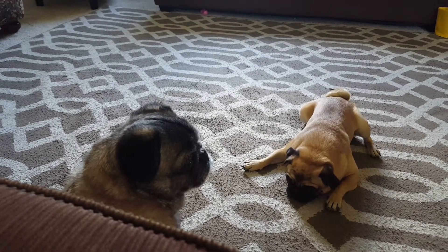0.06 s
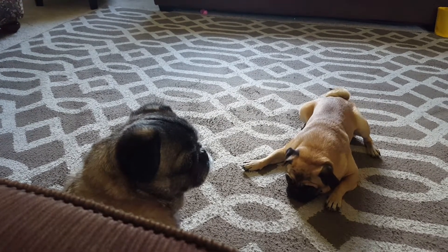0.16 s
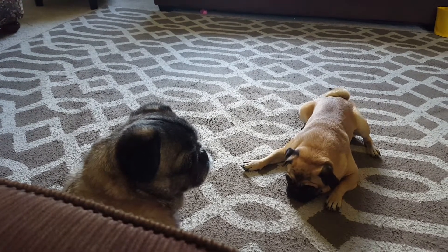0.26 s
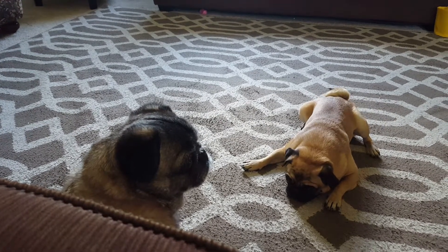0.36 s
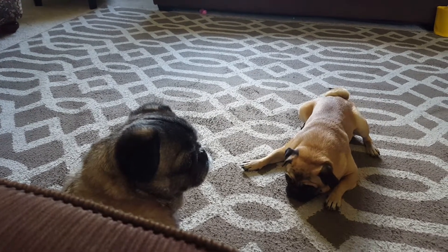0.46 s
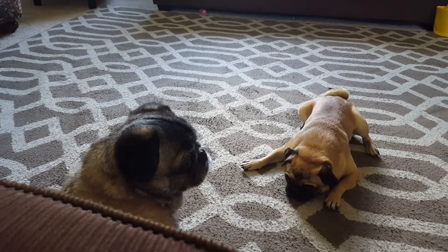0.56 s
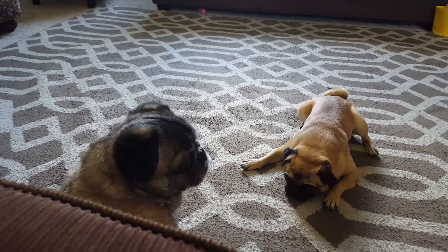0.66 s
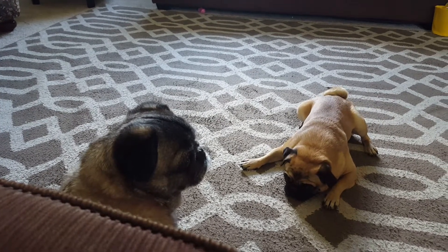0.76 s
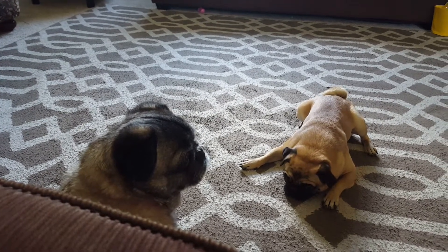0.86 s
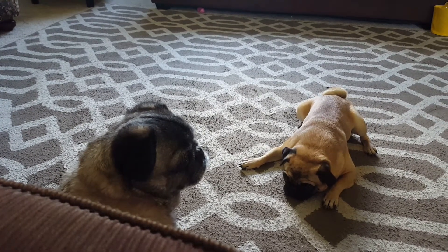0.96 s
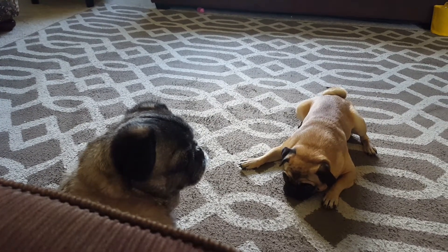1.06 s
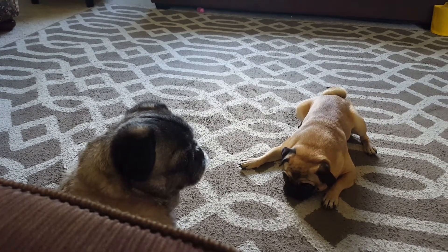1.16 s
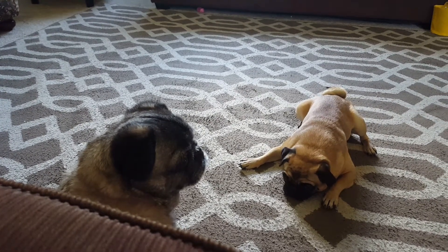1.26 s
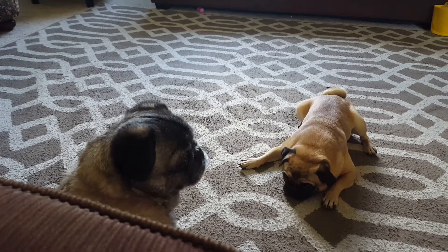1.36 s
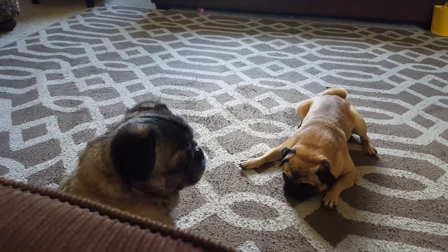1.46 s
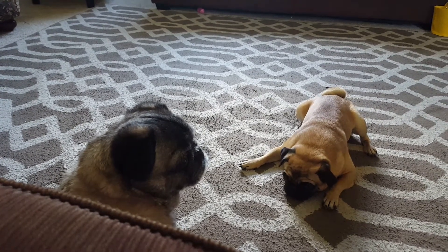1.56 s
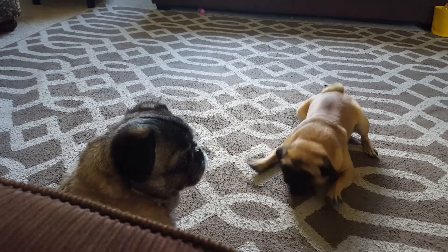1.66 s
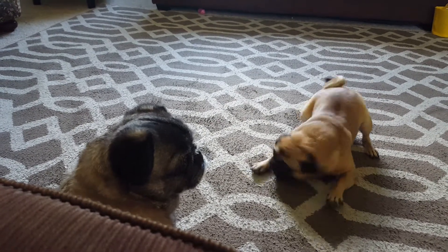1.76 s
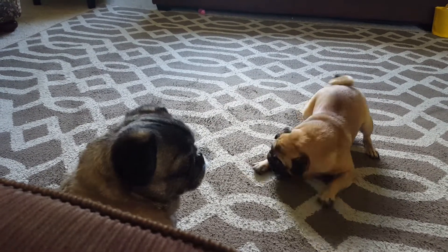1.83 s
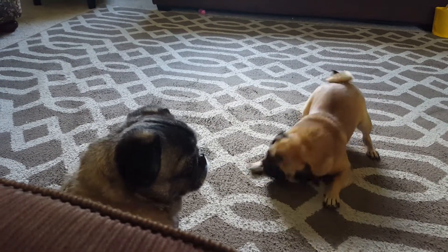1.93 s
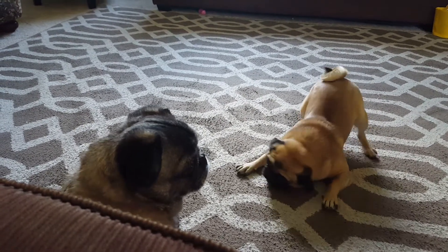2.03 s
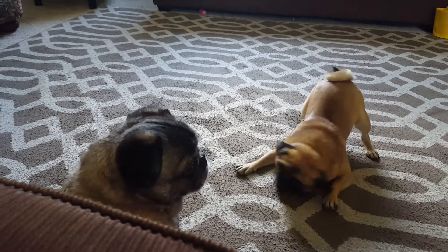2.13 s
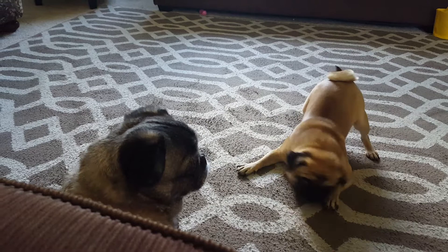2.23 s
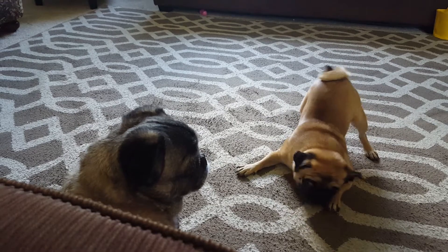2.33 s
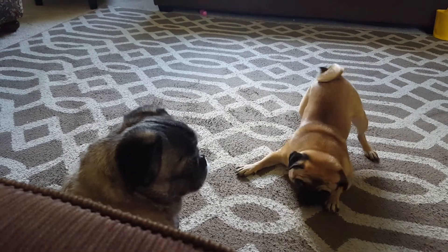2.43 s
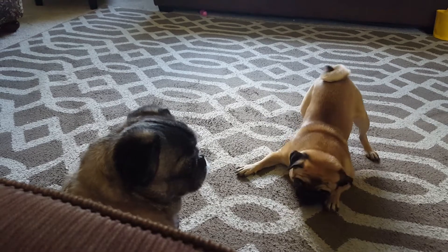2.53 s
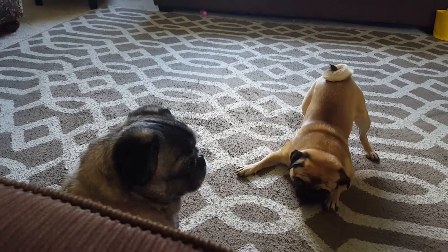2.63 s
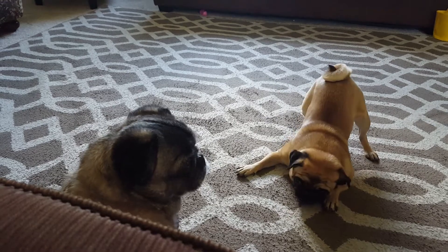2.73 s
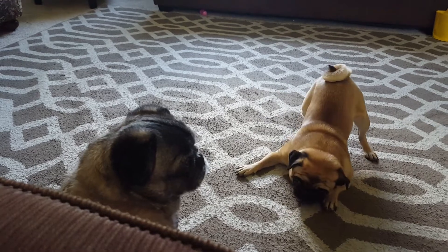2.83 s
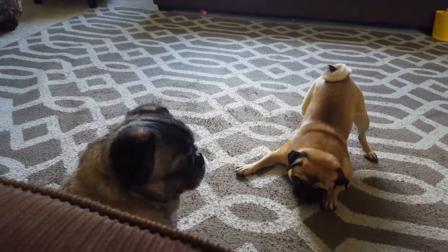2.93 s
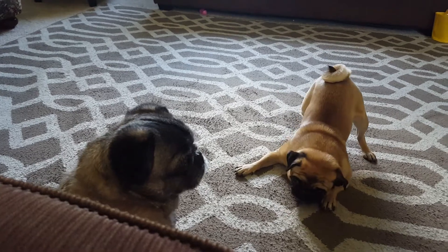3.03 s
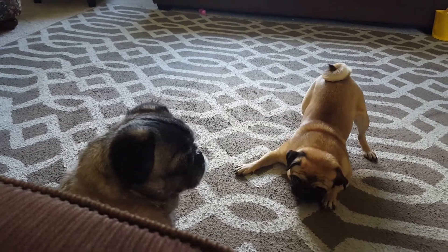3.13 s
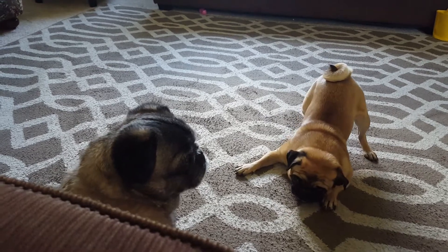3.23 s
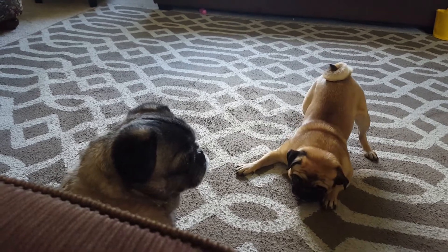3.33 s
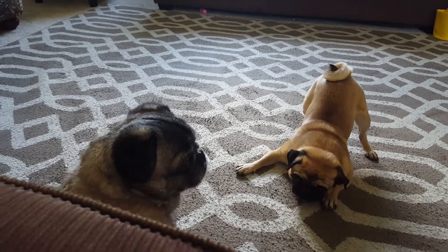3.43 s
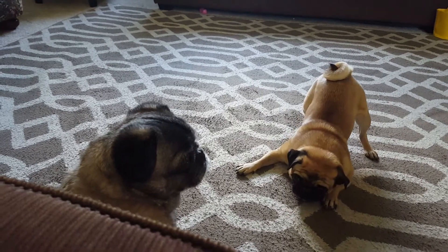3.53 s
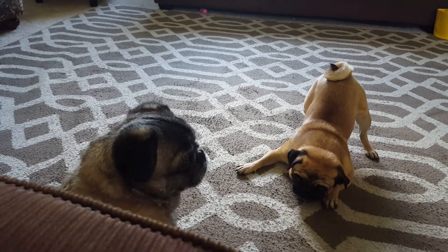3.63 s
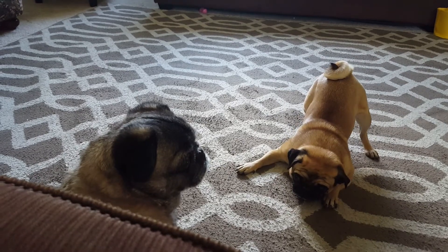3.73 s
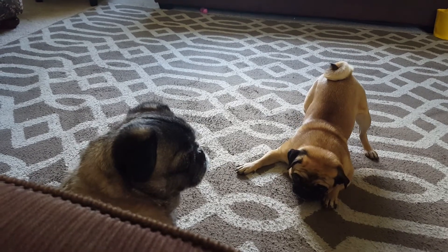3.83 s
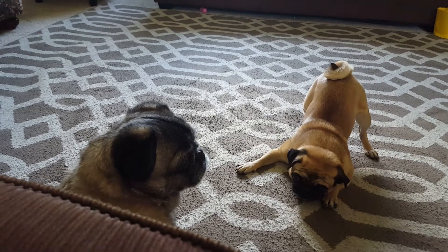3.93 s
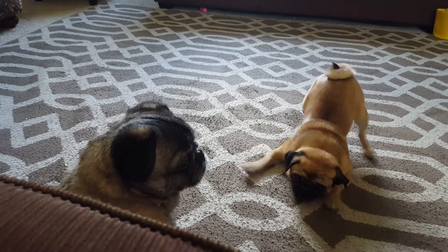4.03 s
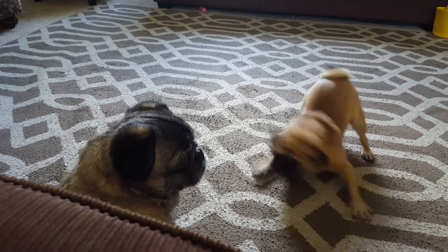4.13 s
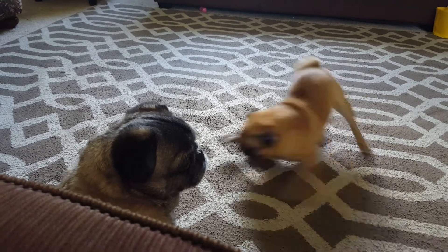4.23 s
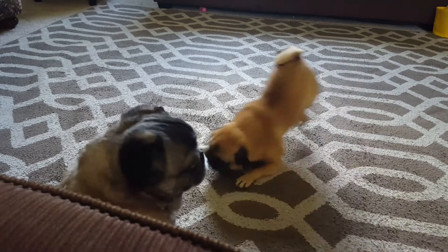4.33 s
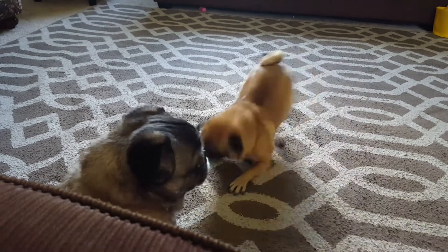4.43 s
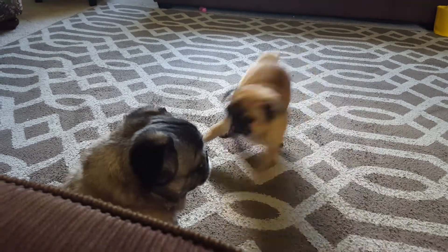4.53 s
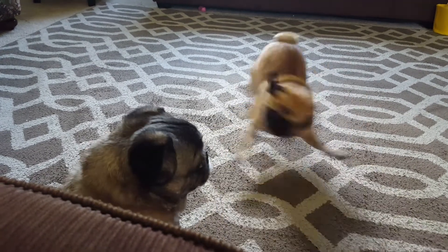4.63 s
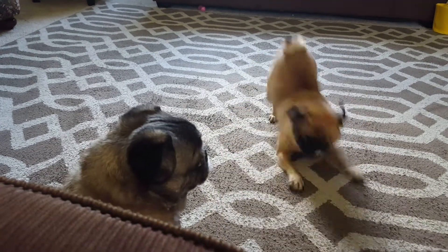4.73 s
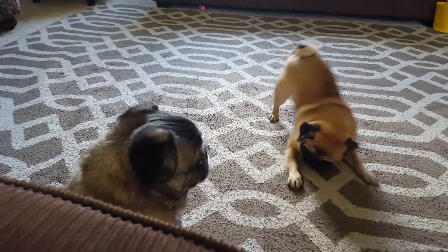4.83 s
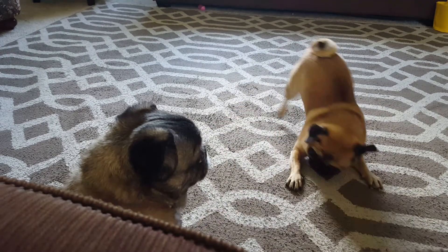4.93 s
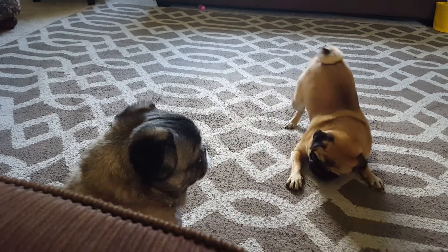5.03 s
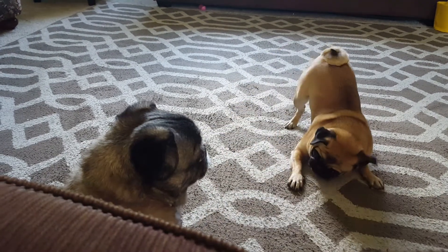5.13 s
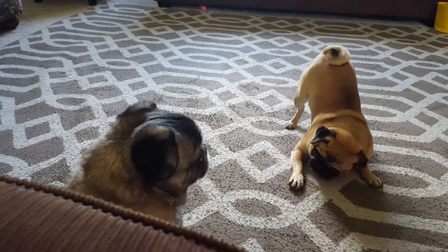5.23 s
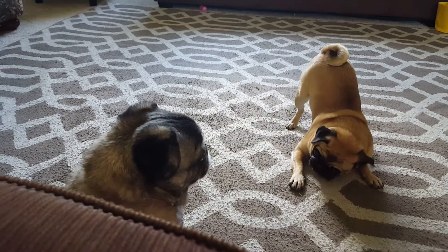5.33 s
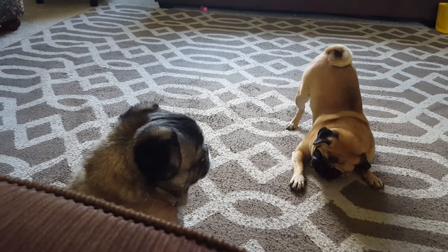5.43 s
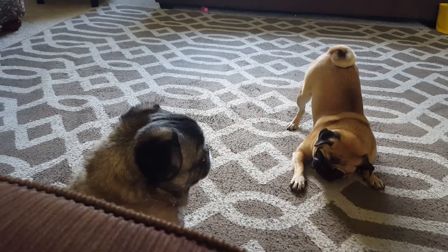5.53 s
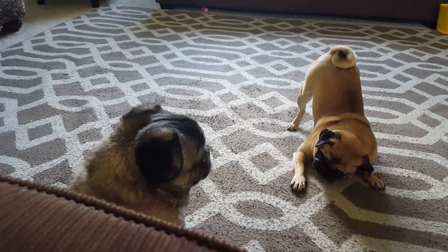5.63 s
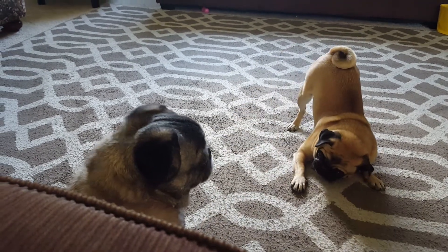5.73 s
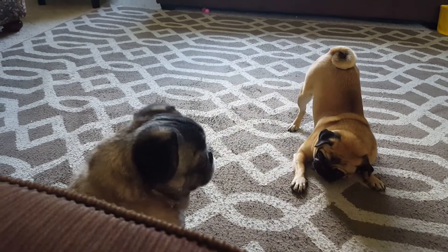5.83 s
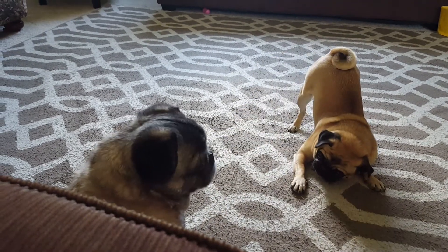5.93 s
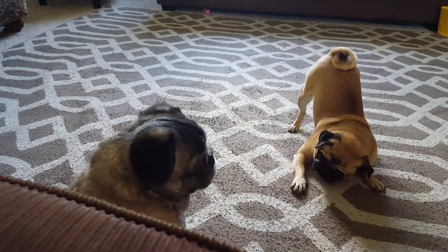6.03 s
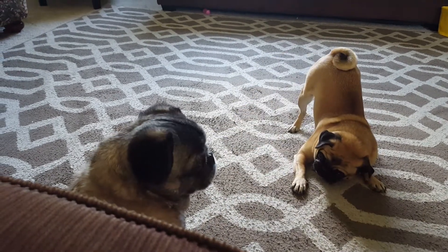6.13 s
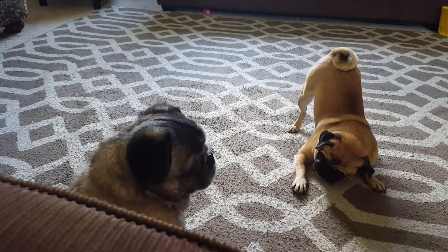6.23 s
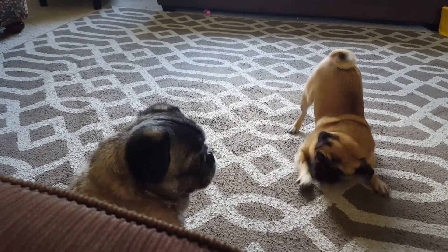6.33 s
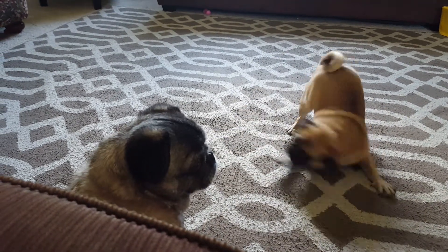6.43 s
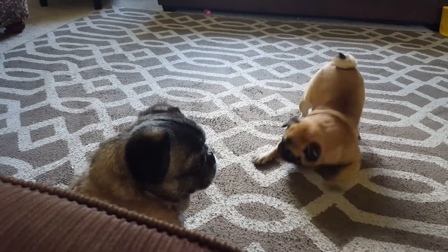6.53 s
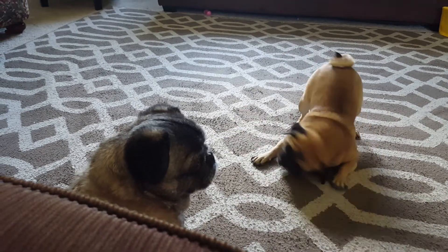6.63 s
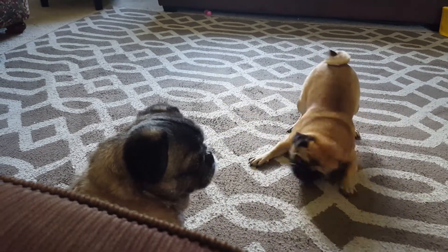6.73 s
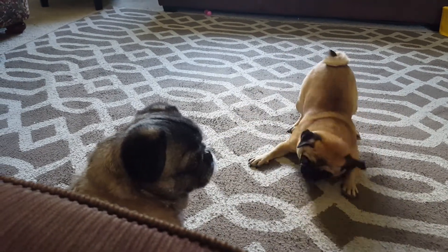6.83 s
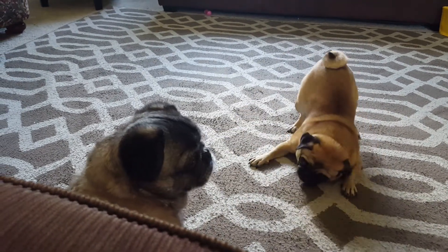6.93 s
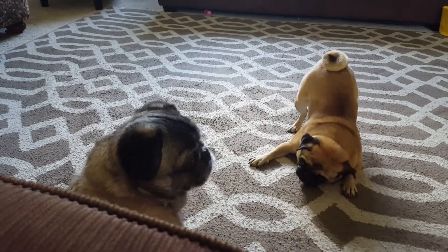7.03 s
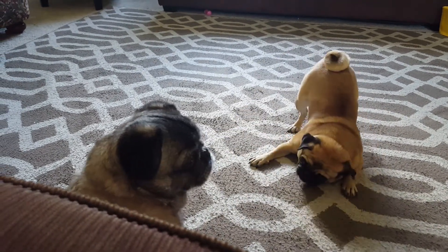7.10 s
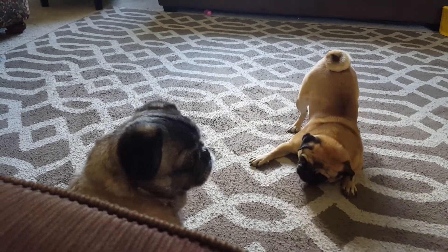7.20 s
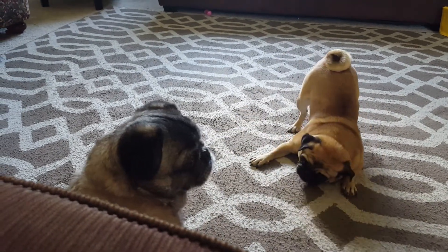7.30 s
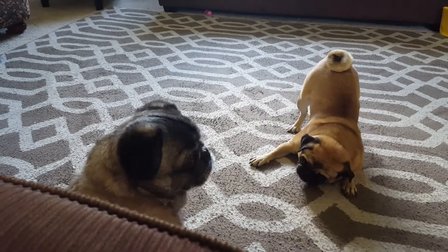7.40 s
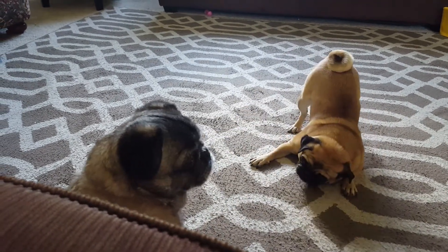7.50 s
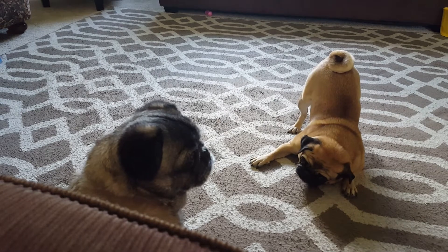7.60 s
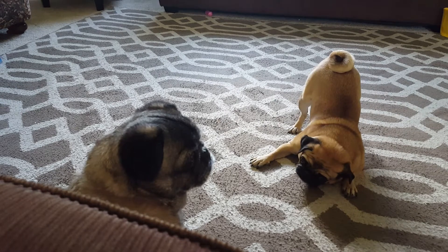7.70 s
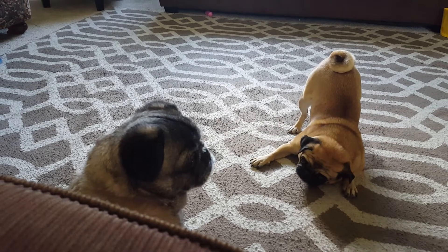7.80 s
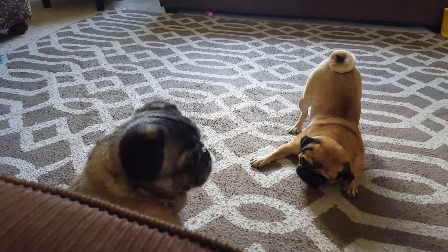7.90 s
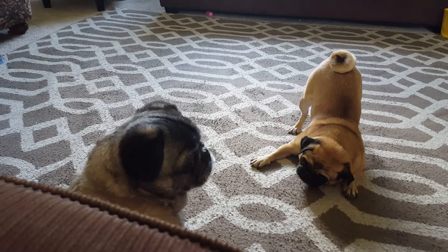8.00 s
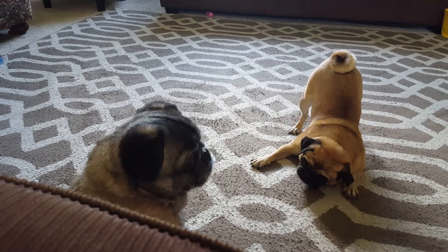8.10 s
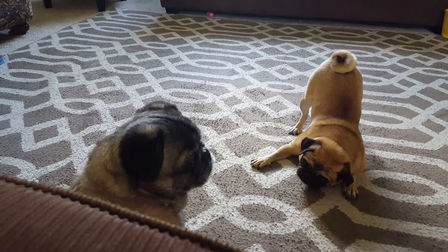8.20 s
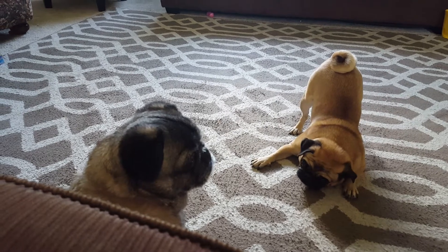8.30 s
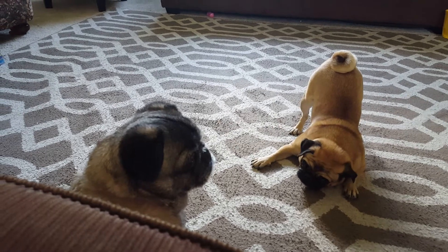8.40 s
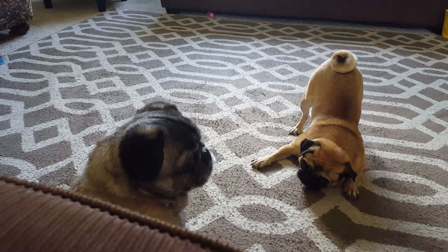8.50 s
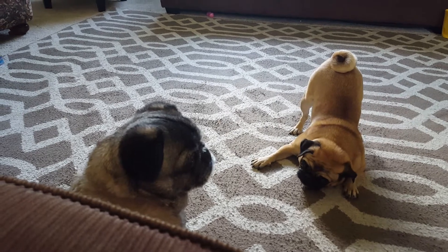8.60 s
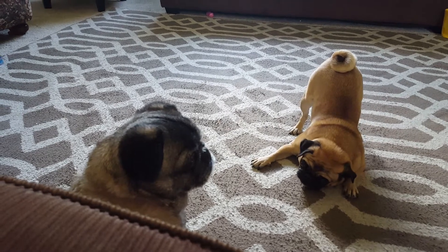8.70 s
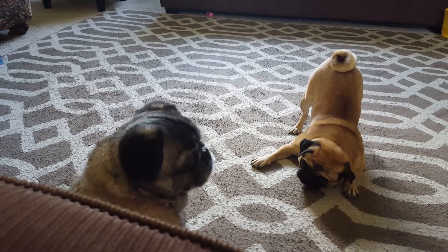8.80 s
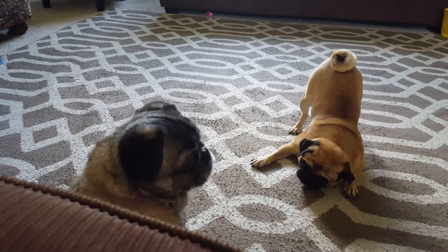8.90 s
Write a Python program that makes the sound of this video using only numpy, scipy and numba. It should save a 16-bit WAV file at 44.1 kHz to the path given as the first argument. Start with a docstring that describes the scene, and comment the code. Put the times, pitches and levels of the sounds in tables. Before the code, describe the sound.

A small dog moans softly, lets out three bursts of hoarse barks with snorts between, then growls low in a living room.

```python
"""A small furnished living room, a pug close to the microphone.
Soft nasal moans wind up to three bursts of hoarse barks, each followed by snorts; a low rattling
growl ends it. The voice is vocal-fold pulses and breath noise through throat resonances, which
the jaw sweeps in the barks. Snorts are air through palate and nostrils. Lips smack, the room rings
briefly. Behind: soft low bumps against the microphone, mostly left, one paw thud and room tone."""
import sys
import numpy as np
from scipy import signal
from scipy.fft import rfft, irfft
from scipy.io import wavfile
from scipy.ndimage import uniform_filter1d
from numba import njit

SR = 44100
rng = np.random.default_rng(int(sys.argv[2]) if len(sys.argv) > 2 else 0)


def dump_mix(stems):
    """Bounce the given channels to the path in sys.argv[1] as a 16-bit WAV at rate SR."""
    frames = np.atleast_2d(stems).T  # one column per channel
    limited = np.clip(frames, -1, 1)  # hard clip at full scale
    pcm = np.round(limited * 32767).astype(np.int16)
    wavfile.write(sys.argv[1], SR, pcm)


N = 395136
TIME_S = np.arange(N) / SR
FREQS_HZ = np.maximum(np.arange(N // 2 + 1) * SR / N, 1)

# Barks. Each row: start, length and attack in seconds, level and sag in dB, release in dB/s,
# widest jaw as a share of the length, pitch shut and wide in Hz, hoarseness 0-1, formant 1 shut and
# wide in Hz, vowel length in seconds, formant 2 top in Hz and trim in dB, formant 3 start and end
# in Hz and trim in dB.
BARKS = [(1.652, 0.12, 0.022, -10, 10.5, 110, .5, 200.8, 295, .33, 890, 1260, .14, 3000, -1.5, 3700, 5110, -1.5),
         (1.805, .175, 0.11, -14, 3.5, 452, .75, 297.2, 404, 0.49, 686, 1340, 0.19, 3150, -4, 3260, 4966, -5.5),
         (2.050, 0.19, 0.14, -16, 1.5, 333, .65, 335.3, 603, 0.56, 810, 1254, .23, 2786, -5, 5800, 4830, -6.5),
         (4.055, .130, 0.029, -9.5, 8.5, 459, .4, 214.1, 355.1, 0.47, 950, 1107, .145, 2860, -7, 6370, 4110, -3),
         (4.272, 0.088, 0.044, -12.5, 2, 225, .42, 386.3, 486.2, .46, 783, 1450, 0.077, 2700, -11, 2900, 4390, -3),
         (4.573, .074, 0.031, -12.5, 3.5, 602.5, .45, 119.8, 150, .42, 1516, 1570, .085, 2715, -5.5, 2620, 3746, -5),
         (6.359, .120, 0.029, -10.5, 7, 274, .27, 189.5, 390, .55, 938, 1159, 0.097, 2814, -4.5, 5760, 3725, -1.5),
         (6.594, 0.14, 0.022, -16.5, 0, 394, .3, 279.2, 323.2, 0.8, 953, 1342, 0.13, 2870, -8, 5080, 4560, -1.5)]
# The "wow" vowel of every bark. Each row: share of the vowel length, formant 1 width factor,
# formant 2 as a share of its top, swell of formants 2 and 3 in dB.
BARK_VOWEL = [(0, .9, 0.58, -15, -23), (.17, 1.2, .63, -4.5, -20.5), (.37, 1.2, 0.84, -0.5, -18.5),
              (.66, 1.1, 0.98, -4, -3.5), (.88, .65, .97, -6, 0), (1.15, 0.4, .93, -2, -5.5)]
# Bark spectra: chest boom, high spray, feed to formant 3. Each row: frequency in Hz, gain in dB.
CHEST_SPECTRUM = [(90, -16), (170, -3), (400, 4.5), (700, 2), (1200, -24), (3000, -34.5)]
SPRAY_SPECTRUM = [(2500, -14), (6000, 7), (8000, 2.5), (10500, -12), (13000, -4), (16000, -15.5)]
RASP_SPECTRUM = [(2000, -10.5), (3300, 5), (5200, -1.5), (6600, -5), (8000, -8)]
# Closed-mouth moans. Each row: start, length and time to top pitch in seconds, low, top and last
# pitch in Hz, level and sag in dB.
MOANS = [(0.574, 1.03, .77, 151.7, 204.4, 170.8, -45, 6), (3.442, 0.62, .59, 139, 189.6, 190.1, -47.5, 1),
         (7.039, .8, .45, 163.3, 180.2, 187.7, -53, -4)]
# Nose and throat, mouth shut. Each row: frequency in Hz, gain in dB.
MOAN_SPECTRUM = [(100, -6.5), (150, 16.5), (200, -2), (350, -4), (540, 5), (750, -10.5), (1100, -19),
                 (1750, -18), (2600, -23), (3600, -48), (4700, -20.5), (5800, -48.5), (7500, -48),
                 (12000, -58.5)]
# Growls, one curve each. Each row: time in seconds, pulse rate in Hz, roughness 0-1, level in dB,
# snarl resonance in Hz, wheeze in dB relative to the throat.
GROWLS = [
    [(1.3, 91, .15, -52, 1610, -25), (1.65, 91, .15, -47, 1600, -22)],
    [(7.66, 96, .15, -54, 1544, -27.5), (7.82, 99, 0.3, -51, 1539, -29), (7.9, 94, .3, -53, 1551, -27.5)],
    [(8.09, 88, 0, -46, 1600, -30.5), (8.15, 92, .25, -40, 1560, -27.5), (8.18, 135, .5, -40, 1510, -24),
     (8.33, 108, .2, -45, 1760, -19.5), (8.41, 118, .6, -46.5, 1630, -23),
     (8.53, 86, .05, -43.5, 1500, -29.5), (8.72, 86, 0.11, -40.5, 1430, -35.5),
     (8.89, 58, 0, -45, 1600, -31.5), (8.96, 72, 0.1, -40.5, 1650, -31)],
]
# Growling throat and nasal wheeze. Each row: frequency in Hz, gain in dB.
GROWL_SPECTRUM = [(70, -14.5), (120, 4), (260, 4), (370, 0.5), (560, 4), (850, -7), (1080, -6.5),
                  (1350, -23.5), (2500, -44)]
WHEEZE_SPECTRUM = [(3500, -4), (5000, 2.5), (6200, -19.5), (8000, -5.5), (10000, -22), (12000, -0.5),
                   (16000, -15.5)]
# Snorts. Each row: start, length and attack in seconds, level and sag in dB, nostril hiss in dB
# relative to the throat.
SNORTS = [(2.40, 0.1, 0.053, -38.5, 9, -26), (3.122, 0.34, .008, -55.5, 15, -5.5),
          (4.82, 0.28, 0.039, -45, 19, -10.5), (6.915, 0.096, .04, -47, 6.5, -23.5)]
# Voiced grunts in the snorts. Each row: start, length and attack in seconds, first pitch in Hz,
# fall in octaves/s, level and sag in dB.
GRUNTS = [(2.41, .13, 0.034, 278, 3.6, -39.5, 22), (3.135, .11, .01, 215, 8.7, -51.5, -1),
          (6.925, 0.077, 0.053, 233.5, 2.9, -48.5, 8)]
# Snorting throat, nostrils and grunting throat. Each row: frequency in Hz, gain in dB.
SNORT_SPECTRUM = [(150, -11), (400, -8), (800, -3), (1100, -5), (1550, 1), (1850, -2), (2400, -20),
                  (5000, -38)]
NOSTRIL_SPECTRUM = [(2500, -16), (4800, -4), (5700, -6), (7300, 1), (9200, -2), (10500, -15), (13500, -11),
                    (16000, -20)]
GRUNT_SPECTRUM = [(70, -26), (140, 11.5), (270, 13.0), (480, -33.0), (2000, -28.0)]
# Lip smacks and throat clicks. Each row: time in seconds, strike level in dB.
SMACKS = [(2.52, -18), (2.56, -30.5), (2.672, -39), (2.875, -49.5), (4.89, -22), (4.958, -25.5),
          (4.991, -33.5)]
# Microphone bumps and one paw thud. Each row: time in seconds, relative strike level in dB,
# left over right in dB.
BUMPS = [(0.108, -35.5, 16), (0.158, -34.5, 26), (0.226, -31.5, 18), (0.263, -28.5, 15), (3.3, -43, 30),
         (3.912, -30, 22), (4.78, -32.5, 1), (5.215, -42, 25), (5.245, -29, 26.5), (7.97, -46, 23)]
# Modes of the mouth and of the bumps. Each row: frequency in Hz, gain in dB, T60 in seconds.
MOUTH_MODES = [(720, -7, 0.011), (1355, -6.5, 0.011), (1500, -19.5, 0.012), (4670, -13, 0.0029)]
BUMP_MODES = [(83.5, -1, 0.18), (126, 0.5, 0.077), (183, 9, 0.015)]
# Microphone port imbalance. Each row: frequency in Hz, left over right in dB.
PORT_BALANCE = [(1400, 0.64), (2400, 2), (4400, -8), (8000, 10), (12000, -1.5)]
# Microphone port phase. Each row: frequency in Hz, lead of the left in radians.
PORT_PHASE = [(500, -.1), (1300, -.38), (4000, -0.65), (9000, -1.1)]
# Room decay. Each row: frequency in Hz, T60 in seconds.
ROOM_T60 = [(150, 0.85), (1000, .38), (4500, 0.41), (14000, 0.081)]
# Diffuse field. Each row: frequency in Hz, left-right coherence 0-1.
COHERENCE = [(50, 0.31), (200, .92), (700, 0.92), (2000, 0.13), (6000, 0.033)]
# Room tone. Each row: frequency in Hz, gain in dB.
ROOM_TONE_SPECTRUM = [(15, -34), (25, -8.5), (76, -8), (130, -4.5), (175, -8.5), (223, -4), (335, -5),
                      (545, -19.5), (591, -19.5), (1520, -29), (16000, -52.5)]


def barks():
    """The jaw sweeps pitch and formant 1; hoarseness swells mid-bark and widens that formant."""
    (age_s, length_s, attack_s, level_db, sag_db, release_db_per_s, widest, shut_hz, wide_hz, hoarse,
     f1_shut_hz, f1_wide_hz, vowel_s, f2_top_hz, f2_db, f3_start_hz, f3_end_hz, f3_db) = events(BARKS)
    shut_s = length_s + .03
    jaw = arch(age_s, widest * length_s, shut_s)
    strain = arch(age_s, .62 * length_s, shut_s)
    # Breath runs out: pitch drops, voice breaks up.
    spent_s = np.clip(age_s - length_s, 0, .15)
    fall_oct_per_s, breakup_per_s = 3.5, 2.5
    pitch_hz = (shut_hz + (wide_hz - shut_hz) * jaw ** 1.3) * 2 ** (-fall_oct_per_s * spent_s)
    rough = np.clip(hoarse * (.45 + .55 * strain) + breakup_per_s * spent_s, 0, 1)
    damping, f2_share, f2_swell_db, f3_swell_db = curves(BARK_VOWEL, age_s / vowel_s)
    f1_hz = f1_shut_hz + (f1_wide_hz - f1_shut_hz) * jaw ** .8
    f3_hz = f3_start_hz + (f3_end_hz - f3_start_hz) * np.clip(age_s / length_s, 0, 1)
    treble_db = f3_db + f3_swell_db
    source = vocal_folds(pitch_hz, rough, jitter=.14, shimmer_db=6.5, air=1.25)
    breathy = source + 1.6 * rng.standard_normal(N)   # air past teeth and tongue
    first = formant(source, f1_hz, width_hz=damping * (230 + 950 * rough))
    second = from_db(f2_db + f2_swell_db) * formant(source, f2_top_hz * f2_share, width_hz=680)
    third = from_db(treble_db) * formant(shaped(breathy, RASP_SPECTRUM), f3_hz, width_hz=1600)
    boom = shaped(source + .33 * rng.standard_normal(N), CHEST_SPECTRUM)
    chest = from_db(-22.5 + 6.5 * rough) * levelled(boom, span_s=.027)
    spray_db = .25 * treble_db - 24.5 + 3.2 * drift(rate_hz=41)
    spray = from_db(spray_db) * levelled(shaped(breathy, SPRAY_SPECTRUM), span_s=.027)
    gain = envelope(age_s, length_s, attack_s, sag_db, release_db_per_s, onset_db=-18)
    return gain * from_db(level_db) * (first - second + third + chest + spray)


def vocal_folds(pitch_hz, rough, jitter, shimmer_db, air):
    """One pulse and one turbulent puff per cycle; roughness adds breath and shakes pitch and level."""
    cycles = np.cumsum(pitch_hz * np.exp(jitter * rough * drift(rate_hz=260))) / SR
    phase = cycles % 1
    closures = np.flatnonzero(np.diff(np.floor(cycles))[:-1]) + 1
    late_samples = np.clip(phase[closures] * SR / pitch_hz[closures], 0, 1)
    pulses = np.zeros(N)
    pulses[closures], pulses[closures - 1] = 1 - late_samples, late_samples
    puffs = unit_rms(np.exp(-3 * phase) * rng.standard_normal(N))
    breath = np.clip(air * rough, 0, .97)
    flow = np.sqrt((1 - breath ** 2) * SR / pitch_hz) * pulses + breath * puffs
    return flow * from_db(shimmer_db * rough * drift(rate_hz=170))


def formant(source, hz, width_hz, span_s=.017):
    """Steep-sided throat resonance at a steady level."""
    hz, width_hz = hz + np.zeros(N), width_hz + np.zeros(N)
    return levelled(resonator(resonator(source, hz, width_hz), hz, width_hz), span_s)


def moans():
    """A nearly clean nasal hum that starts flat and climbs as the dog winds up."""
    age_s, length_s, *_, level_db, sag_db = events(MOANS)
    attack_s, settle_s = .07, .11
    knots = []
    for start_s, hold_s, climb_s, low_hz, top_hz, last_hz, *_ in MOANS:
        knots += [(start_s, .92 * low_hz), (start_s + settle_s, low_hz),
                  (start_s + climb_s, top_hz), (start_s + hold_s + attack_s, last_hz)]
    pitch_hz, = curves(knots, TIME_S)
    source = vocal_folds(pitch_hz, rough=.13, jitter=.07, shimmer_db=5, air=1.4)
    gain = envelope(age_s, length_s, attack_s, sag_db, release_db_per_s=399.5, onset_db=-14)
    return gain * from_db(level_db) * levelled(shaped(source, MOAN_SPECTRUM), span_s=.04)


def growls():
    """Slow pulses ring the throat; the lips shift a snarl that grows with roughness; the nose wheezes."""
    active = sum((TIME_S >= rows[0][0]) & (TIME_S < rows[-1][0]) for rows in GROWLS)
    gate = uniform_filter1d(np.minimum(active, 1.), size=160)
    knots = [row for rows in GROWLS for row in rows]
    pulse_hz, rough, level_db, snarl_hz, wheeze_db = curves(knots, TIME_S)
    wobble = 1 + .045 * drift(rate_hz=22)
    source = vocal_folds(pulse_hz * wobble, rough, jitter=.1, shimmer_db=5, air=.9)
    throat = levelled(shaped(source, GROWL_SPECTRUM), span_s=.046)
    snarl = from_db(-15 + 8.5 * rough) * formant(source, snarl_hz, width_hz=210, span_s=.12)
    breathy = .5 * source + rng.standard_normal(N)
    wheeze = from_db(wheeze_db) * unit_rms(shaped(breathy, WHEEZE_SPECTRUM))
    return gate * from_db(level_db) * (throat + snarl + wheeze)


def snorts():
    """Air flutters the soft palate and hisses through narrow nostrils."""
    age_s, length_s, attack_s, level_db, sag_db, hiss_db = events(SNORTS)
    air = rng.standard_normal(N) * from_db(2.4 * drift(rate_hz=130))
    throat = unit_rms(shaped(air, SNORT_SPECTRUM))
    nostrils = from_db(hiss_db) * unit_rms(shaped(air, NOSTRIL_SPECTRUM))
    gain = envelope(age_s, length_s, attack_s, sag_db, release_db_per_s=254, onset_db=-19)
    return gain * from_db(level_db) * (throat + nostrils)


def grunts():
    """A dull falling tone in the throat."""
    age_s, length_s, attack_s, first_hz, fall_oct_per_s, level_db, sag_db = events(GRUNTS)
    pitch_hz = first_hz * 2 ** (-fall_oct_per_s * np.clip(age_s, 0, length_s))
    source = vocal_folds(pitch_hz, rough=.2, jitter=.1, shimmer_db=5, air=.6)
    gain = envelope(age_s, length_s, attack_s, sag_db, release_db_per_s=600, onset_db=-17)
    return gain * from_db(level_db) * levelled(shaped(source, GRUNT_SPECTRUM), span_s=.05)


def smacks():
    """Wet clicks ring the mouth briefly."""
    times_s, levels_db = np.transpose(SMACKS)
    return struck(times_s, levels_db, MOUTH_MODES)


def bumps():
    """Soft bumps against the microphone, mostly on the left, and one paw thud: low, damped modes."""
    times_s, levels_db, pan_db = np.transpose(BUMPS)
    sides = np.array([struck(times_s, levels_db + side * pan_db / 2, BUMP_MODES) for side in (1, -1)])
    bass_band = signal.butter(2, [55, 300], "band", fs=SR, output="sos")
    return from_db(-4.5) * signal.sosfilt(bass_band, sides)


def mic_ports(x):
    """Two microphone ports, each with its own colour and phase."""
    left = from_db(at_hz(PORT_BALANCE, FREQS_HZ) / 2) * np.exp(.5j * at_hz(PORT_PHASE, FREQS_HZ))
    pair = np.array([left, 1 / left])
    return irfft(rfft(x) * pair / np.abs(pair).mean(axis=0), N)


def reverb(x, size=24000):
    """Dense reflections off walls and furniture; the top octave dies first."""
    time_s, hz = TIME_S[:size], np.arange(size // 2 + 1) * SR / size
    spectrum = diffuse_spectrum(size)
    tail = 0
    for low_hz in 62.5 * 2. ** np.arange(8):
        octave = irfft(spectrum * ((hz >= low_hz) & (hz < 2 * low_hz)), size)
        tail = tail + octave * from_db(-60 * time_s / at_hz(ROOM_T60, low_hz * np.sqrt(2)))
    onset = ramp(time_s - .003, span_s=.0013)
    response = unit_rms(tail * onset) / np.sqrt(size)
    return signal.fftconvolve(x[None], response, axes=1)[:, :N]


def room_tone():
    """Steady, diffuse, bass-heavy noise."""
    return unit_rms(shaped(irfft(diffuse_spectrum(N), N), ROOM_TONE_SPECTRUM))


def diffuse_spectrum(size):
    """Stereo noise from all round: coherent in the low mids, unrelated in the treble."""
    mid, side = rfft(rng.standard_normal((2, size)))
    coherence = at_hz(COHERENCE, np.maximum(np.arange(len(mid)) * SR / size, 1))
    return np.sqrt(1 + coherence) * mid + np.sqrt(1 - coherence) * side * [[1], [-1]]


def struck(times_s, levels_db, modes):
    """Impulses ring a bank of decaying modes."""
    ringing, hits = np.zeros(N), (times_s * SR).astype(int)
    for hz, gain_db, t60_s in modes:
        clicks = np.full(N, 1e-18)
        clicks[hits] = from_db(levels_db + gain_db)
        radius, step_rad = from_db(-60 / (t60_s * SR)), 2 * np.pi * hz / SR
        poles = [1, -2 * radius * np.cos(step_rad), radius ** 2]
        ringing += signal.lfilter([0, np.sin(step_rad)], poles, clicks)
    return ringing


@njit
def resonator(x, hz, width_hz):
    """Two-pole band-pass with moving centre and width."""
    y = np.zeros(len(x))
    for i in range(2, len(x)):
        r = np.exp(-np.pi * width_hz[i] / SR)
        drive = (1 - r * r) / 2 * (x[i] - x[i - 2])
        y[i] = drive + 2 * r * np.cos(2 * np.pi * hz[i] / SR) * y[i - 1] - r * r * y[i - 2]
    return y


def shaped(x, spectrum):
    """Minimum-phase filter with the given spectrum."""
    cepstrum = irfft(np.log(from_db(at_hz(spectrum, FREQS_HZ))), N)
    cepstrum[1:N // 2] *= 2
    cepstrum[N // 2 + 1:] = 0
    return irfft(rfft(x) * np.exp(rfft(cepstrum)), N)


def events(table):
    """Per sample: age of the latest event in seconds, then its other columns."""
    columns = np.transpose(table)
    latest = np.maximum(np.searchsorted(columns[0], TIME_S) - 1, 0)
    start_s, *others = columns[:, latest]
    return [TIME_S - start_s] + others


def envelope(age_s, length_s, attack_s, sag_db, release_db_per_s, onset_db):
    """Gain: attack from the onset level, sagging hold, release."""
    attack_db = onset_db * (1 - ramp(age_s, attack_s)) ** 1.7
    hold_db = sag_db * ramp(age_s - attack_s, length_s - attack_s)
    release_db = release_db_per_s * np.maximum(age_s - length_s, 0)
    return uniform_filter1d((age_s > 0) * from_db(attack_db - hold_db - release_db), size=160)


def arch(age_s, top_s, end_s):
    """Rounded swing from 0 to 1 and back."""
    return np.sin(np.pi / 2 * (ramp(age_s, top_s) + ramp(age_s - top_s, end_s - top_s))) ** 2


def ramp(age_s, span_s):
    """Linear rise from 0 to 1."""
    return np.clip(age_s / np.maximum(span_s, 1e-3), 0, 1)


def curves(rows, position):
    """Later columns interpolated along the first."""
    knots, *columns = np.transpose(rows)
    return [np.interp(position, knots, column) for column in columns]


def at_hz(rows, hz):
    """Table lookup on a log-frequency axis."""
    knots_hz, values = np.transpose(rows)
    return np.interp(np.log(hz), np.log(knots_hz), values)


def drift(rate_hz):
    """Random wander at unit RMS."""
    return unit_rms(np.interp(TIME_S * rate_hz, np.arange(N // 8), rng.standard_normal(N // 8)))


def levelled(x, span_s):
    """Short-time power held at one."""
    power = uniform_filter1d(x * x, int(span_s * SR))
    smoothed = uniform_filter1d(power, int(span_s * SR / 2))
    return x / np.sqrt(np.abs(smoothed) + 1e-12)


def unit_rms(x):
    """Overall power scaled to one."""
    return x / np.sqrt(np.mean(x ** 2) + 1e-20)


def from_db(db):
    """Decibels to gain."""
    return 10 ** (np.asarray(db) / 20)


def scene():
    """The dog in its room, over bumps and room tone."""
    loud = barks()
    soft = moans() + growls() + snorts() + grunts() + smacks()
    loud_stereo = mic_ports(loud + from_db(-10) * reverb(loud))
    soft_stereo = (soft + from_db(-6) * reverb(soft)) * from_db([[.69], [-.69]])   # slightly left
    return loud_stereo + soft_stereo + bumps() + from_db(-50) * room_tone()


def record(dry):
    """Soft peak clipping, then a steep low-pass."""
    cutoff_hz = 15900
    rounded = dry / (1 + dry ** 6) ** (1 / 6)
    return signal.sosfilt(signal.ellip(10, .1, 80, cutoff_hz, fs=SR, output="sos"), rounded)


dry = scene()
out = record(dry)
dump_mix(out)
```